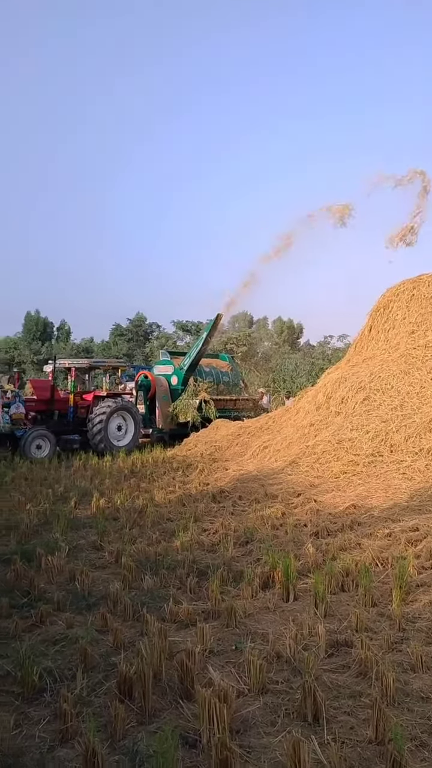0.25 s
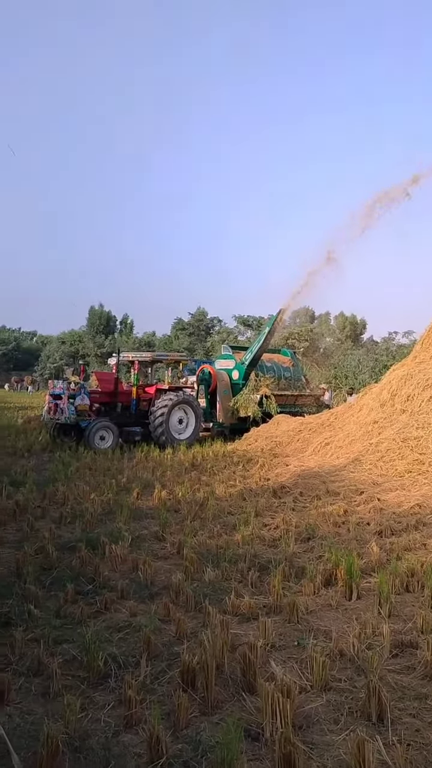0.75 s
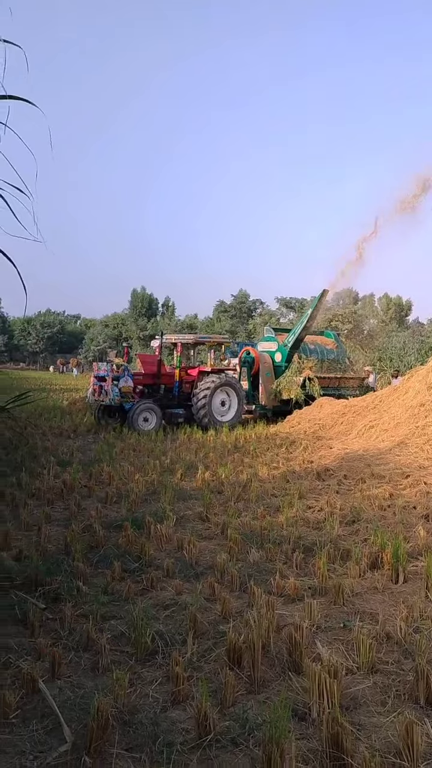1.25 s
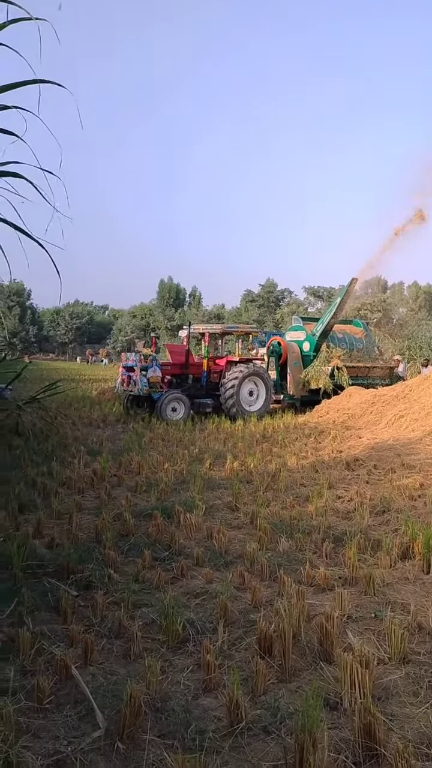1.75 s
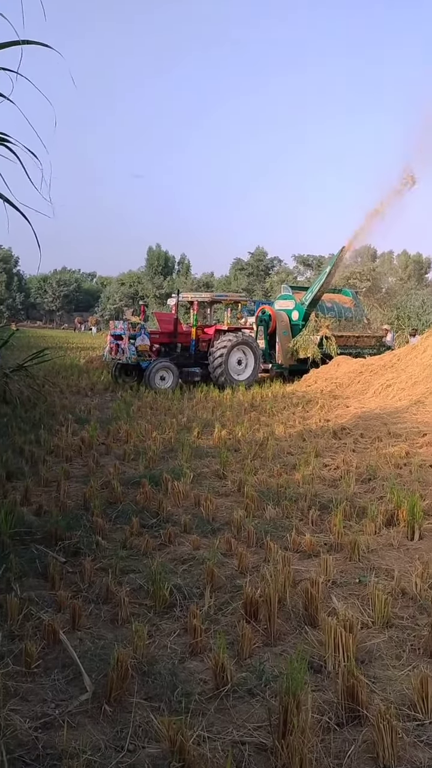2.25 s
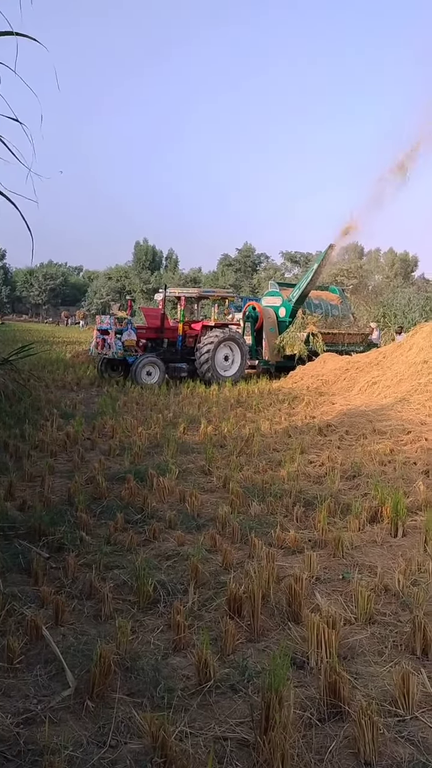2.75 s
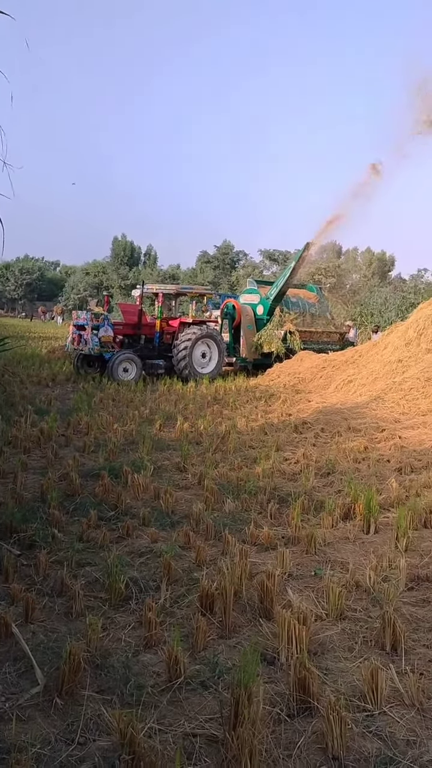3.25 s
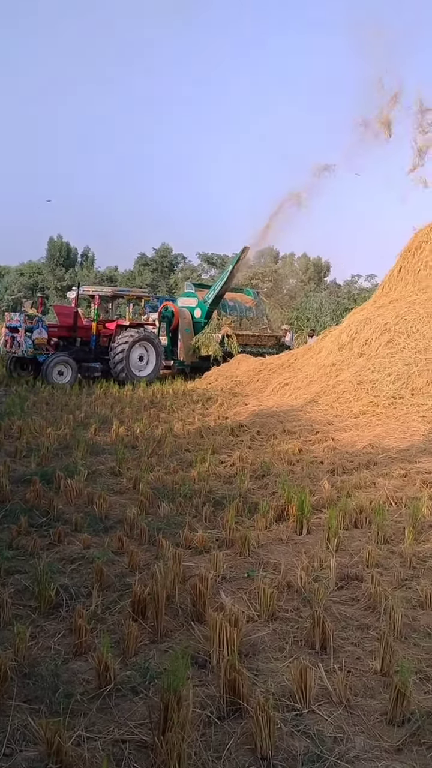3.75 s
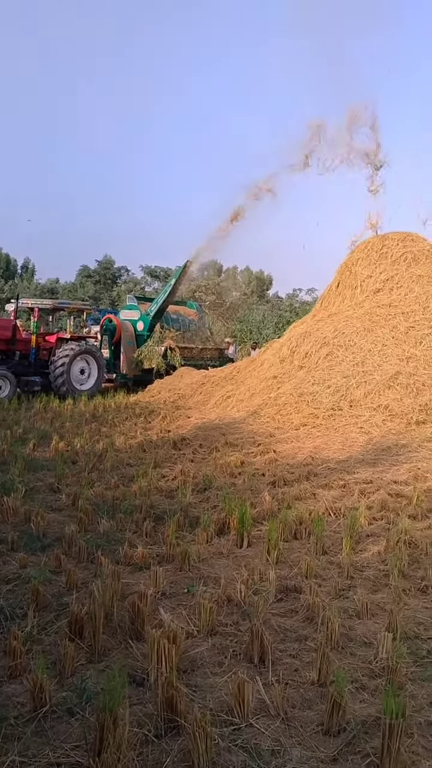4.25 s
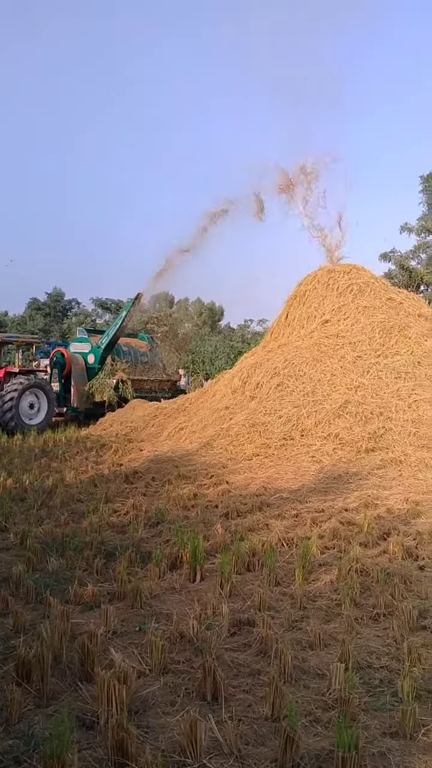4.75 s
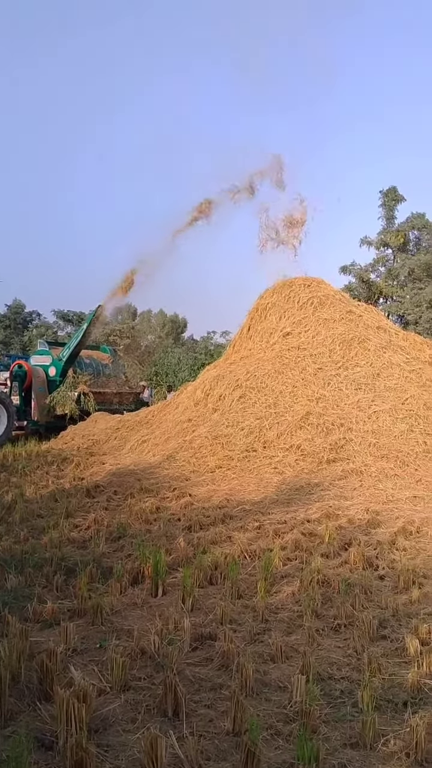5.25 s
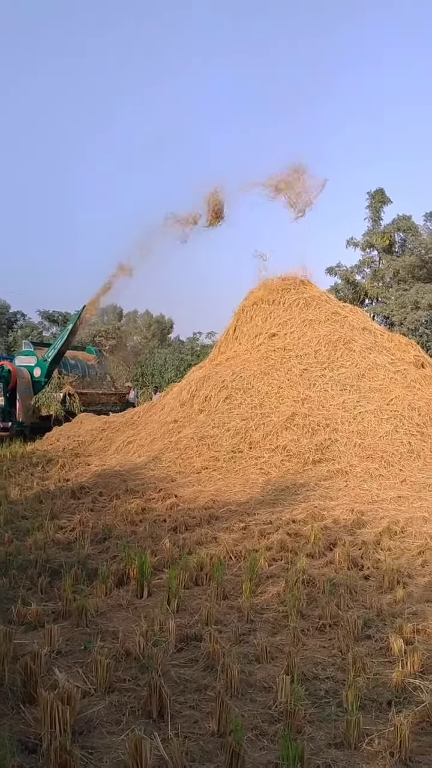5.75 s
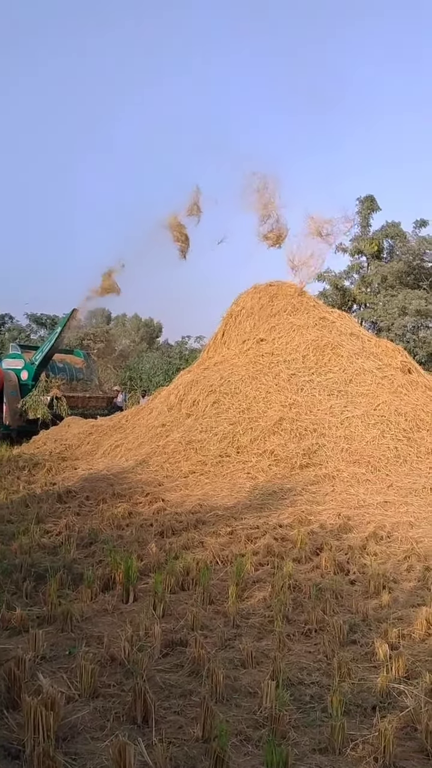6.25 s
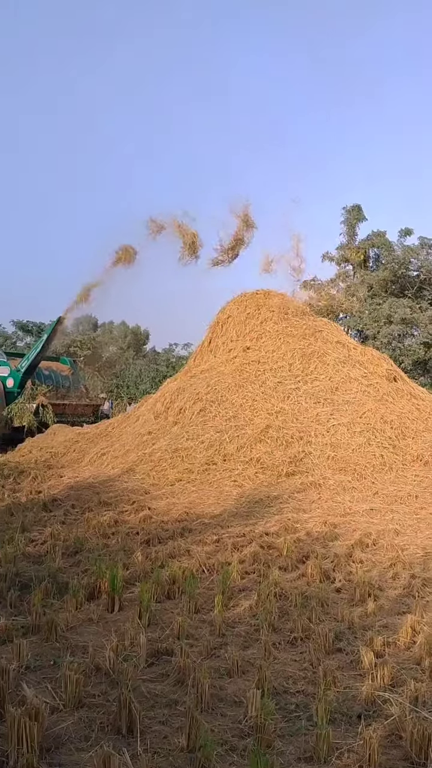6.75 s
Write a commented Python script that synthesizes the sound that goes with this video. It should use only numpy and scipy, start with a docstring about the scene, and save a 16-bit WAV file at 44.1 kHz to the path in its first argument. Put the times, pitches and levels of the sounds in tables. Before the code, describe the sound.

In an open stubble field, a tractor's diesel engine runs a thresher without pause. A low, steady blower hum sits inside a rough sheet-metal drum roar, with fast engine knocking and faint straw hiss on top. Around five seconds the machine sags slightly under load, the pitch dips and the firing throbs harder, then it recovers. Heard from some distance on a hand-held phone that turns, subtly shifting the tone.

```python
"""Tractor-driven rice thresher in a stubble field

A four-cylinder diesel (sines on its cycle, knock noise, struck block) drives the thresher by power shaft.
The geared straw blower is sines on its blade pass; drum roar is noise through sheet-metal resonances.
Straw hisses from the chute as treble noise and ticks on the stubble. A hand-held phone turns toward the
tractor and away; its right port hears the machine a little late and again off the holder's hand and body.
"""
import sys
import numpy as np
from scipy import signal
from scipy.fft import rfft, irfft, next_fast_len
from scipy.io import wavfile
from scipy.ndimage import uniform_filter1d, map_coordinates

SR = 44100
rng = np.random.default_rng(int(sys.argv[2]) if len(sys.argv) > 2 else 0)


def dump_mix(stems):
    """Bounce the given channels to the path in sys.argv[1] as a 16-bit WAV at rate SR."""
    frames = np.atleast_2d(stems).T  # one column per channel
    limited = np.clip(frames, -1, 1)  # hard clip at full scale
    pcm = np.round(limited * 32767).astype(np.int16)
    wavfile.write(sys.argv[1], SR, pcm)


N = 309582

BLADE_PASSES_PER_CYCLE = 10.556  # cycle = one full engine cycle, four firings
FREE_HZ = 140  # blade pass with a light feed; sag_hz counts down from it


def amp(db):
    """Decibels to amplitude."""
    return 10 ** (np.asarray(db) / 20)


def unit(x):
    """Scale to rms 1."""
    return x / np.sqrt(np.mean(x ** 2) + 1e-20)


def along(points, hz):
    """Interpolate (Hz, value) points on a log frequency axis."""
    f, v = np.transpose(points)
    return np.interp(np.log(hz + 1), np.log(f + 1), v)


def curves(rows):
    """One value per sample for each column after the time."""
    s, *cols = np.transpose(rows)
    return [np.interp(np.arange(N) / SR, s, c) for c in cols]


def wobble(knots_per_s):
    """Smooth random curve: a spline through normal random knots."""
    fine = np.arange(0, N / SR * knots_per_s + 1, 1 / 16)
    knots = rng.standard_normal(int(N * knots_per_s / SR) + 4)
    return np.interp(np.arange(N) * knots_per_s / SR, fine, map_coordinates(knots, [fine]))


def filtered(x, response):
    """Multiply the spectrum of x by a response of frequency."""
    m = next_fast_len(N + 8192)
    return irfft(rfft(x, m) * response(np.fft.rfftfreq(m, 1 / SR)), m)[..., :N]


def rush(gate, colour_db, patchy_db):
    """Two unrelated noises of one colour, rms 1, sharing a gate and patches of random gain."""
    z = signal.stft(gate * rng.standard_normal((2, N)), nperseg=512)[2]
    field = uniform_filter1d(rng.standard_normal(z.shape[1:]), size=8, axis=0)
    field = uniform_filter1d(field, size=12, axis=1)
    pair = signal.istft(z * amp(patchy_db * unit(field)), nperseg=512)[1][:, :N]
    return unit(filtered(pair, lambda hz: amp(colour_db(hz))))


def lines(turns, table, waver_db, drift_turns):
    """Sines on multiples of a turning shaft, each wavering in level and phase."""
    total = np.zeros(N)
    for multiple, db in table:
        level = np.sqrt(2) * amp(db + waver_db * wobble(9))
        phase_turns = multiple * turns + rng.random() + drift_turns * wobble(4.5)
        total += level * np.sin(2 * np.pi * phase_turns)
    return total


def blower(blades, sag_hz):
    """Blade-pass tone and multiples; it weakens as the speed sags."""
    # blower tone: blade_pass_multiple, relative_db
    blade_lines = [(1, 0), (2, -20), (3, -33), (4, -32), (5, -28)]
    free_db, db_per_hz = -26.5, -0.54
    return amp(free_db + db_per_hz * sag_hz) * lines(blades, blade_lines, waver_db=-0.36, drift_turns=0.0059)


def exhaust(cycles, sag_hz):
    """Exhaust pulses, four a cycle; unequal cylinders fill in between; most strengthen as the speed sags."""
    # exhaust tones: engine_cycle_multiple, relative_db
    exhaust_lines = [(4, 1), (8, 0), (10, -15), (11, -14), (12, -8), (13, -11), (14, -10), (15, -18),
                     (18, -15), (19, -13), (20, -16), (22, -10), (23, -15), (25, -21), (26, -24)]
    free_db, db_per_hz = -41.5, 0.5
    fourth_db, fourth_db_per_hz2 = -42.5, -1.38
    main = amp(free_db + db_per_hz * sag_hz) * lines(cycles, exhaust_lines, waver_db=0.6, drift_turns=0.012)
    # the firing tone's fourth multiple fades with the square of the sag
    fourth = lines(cycles, [(16, fourth_db)], waver_db=0.0, drift_turns=0.011)
    return main + amp(fourth_db_per_hz2 * sag_hz ** 2) * fourth


def gear_train(cycles):
    """Gear mesh whine and a shaft tone just above the second exhaust line, locked to the engine."""
    # gear mesh: engine_cycle_multiple, level_db (rms)
    mesh_lines = [(48, -56), (52, -56), (54, -57), (55, -56), (62, -61), (66, -57), (75, -63), (80, -60),
                  (87, -62), (104, -62), (112, -62)]
    # shaft tone: engine_cycle_multiple, level_db (rms)
    shaft_lines = [(8.44, -52)]
    total = lines(cycles, mesh_lines, waver_db=1.5, drift_turns=.03)
    for multiple, db in shaft_lines:
        phase = 2 * np.pi * (multiple * cycles + .04 * wobble(4))
        total += np.sqrt(2) * amp(db + wobble(6)) * np.sin(phase)
    return total


def beaters(cycles):
    """Tones on multiples of the drum's beater pass."""
    # beater tone: beater_pass_multiple, level_db (rms)
    beater_lines = [(2, -47.5), (4, -60.5)]
    passes_per_cycle = 8.61
    return lines(passes_per_cycle * cycles, beater_lines, waver_db=2.5, drift_turns=0.15)


def hum(blade_hz):
    """All shaft-locked tones; load shows as a sag in speed."""
    blades, sag_hz = np.cumsum(blade_hz) / SR, FREE_HZ - blade_hz
    cycles = blades / BLADE_PASSES_PER_CYCLE
    return blower(blades, sag_hz) + exhaust(cycles, sag_hz) + gear_train(cycles) + beaters(cycles)


def drum(level_db):
    """Beaten straw and air roar through the casing's resonances."""
    # roar spectrum: freq_hz, relative_density_db
    roar = [(20, -29.5), (35, -20.5), (45, -12.5), (70, -9), (90, -5.5), (128, -2), (170, -2.5),
            (200, -5.5), (260, -6), (400, -11.5), (700, -7.5), (1100, -10.5), (1500, -13), (1750, -23),
            (2600, -19), (5000, -35), (9000, -88)]
    # sheet-metal resonances: centre_hz, width_hz, boost_db
    panels = [(228.6, 24, 3.5), (300, 4.7, -0.5), (586, 9.9, -1), (594.3, 10, 7), (623, 54, 4),
              (703, 47, 4), (867, 20, 7), (994, 25, 4.5), (1040, 14, 4.5), (1075, 19, 2.5), (1145, 18, 4),
              (1300, 90, 4), (1340, 26, 1.5), (1488, 58, 6.5), (1640, 60, -0.5), (2100, 260, 9.5)]
    throb_db, throb_knots_per_s = .35, 60

    def casing_db(hz):
        return along(roar, hz) + sum(db / (1 + (2 * (hz - c) / w) ** 2) for c, w, db in panels)

    throb = amp(throb_db * wobble(throb_knots_per_s))  # clumps of straw meet the beaters
    return amp(level_db + 0.15 * wobble(7)) * rush(throb, casing_db, patchy_db=0.5)


def diesel_and_straw(cycles, pulse, knock_db, straw_db):
    """Combustion knock and straw hiss: noises swelling with each firing, every second one a little harder."""
    # knock spectrum: freq_hz, relative_density_db
    clatter = [(900, -33), (1800, -4.5), (2600, -1), (3300, -2), (3850, -4), (4300, -9), (5900, -14.5),
               (7000, -22.5), (8400, -41.5), (9500, -61)]
    # straw hiss spectrum: freq_hz, relative_density_db
    hiss = [(5000, -21.5), (7500, -12.5), (8500, -11.5), (10000, -5.5), (11000, -1.5), (13000, -1.5),
            (15000, -0.5), (16000, -5)]
    flutter_db, flutter_knots_per_s = .5, 45
    pair, firing, double = (np.cos(2 * np.pi * k * cycles) for k in (2, 4, 8))
    surge = amp(.4 * wobble(24))  # uneven swell shared by knock and straw hiss
    gate = surge * (1 + .03 * pair + pulse * firing + .03 * double)
    knock = rush(gate, lambda hz: along(clatter, hz), patchy_db=0.7)
    knock *= amp(knock_db + 0.17 * wobble(2.0))
    straw = rush(gate, lambda hz: along(hiss, hz), patchy_db=1.1)
    straw *= amp(straw_db + flutter_db * wobble(flutter_knots_per_s))
    return knock + straw


def valves(cycles, level_db, count=30):
    """Firings, valves and gears strike at the same crank angles every cycle and ring the block."""
    # firings and valve seats, third cylinder hardest: cycle_share, low_ring_db, high_ring_db
    strikes = [(.03, 3, 9), (.1, 10, 5), (.19, 8, 3), (.248, 7, 10), (.297, 10.5, 7), (.356, 7, 3),
               (.51, 14.5, 10), (.551, 10.5, 13.5), (.6, 2, 6), (.764, 11.5, 10), (.836, 11.5, 4),
               (.936, 4, 2)]
    # ring of the engine block: freq_hz, relative_density_db
    block = [(300, -40), (550, -6), (750, -7), (1000, -1), (1200, 1), (1480, 1.5), (1560, -8), (1800, -9),
             (2000, -6), (2150, -8), (2400, -3), (2650, -10), (3000, -18), (4500, -30), (7000, -60),
             (9000, -90)]
    split_hz = 1800  # between low and high ring
    loud_angle, *loud_db = np.transpose(strikes)
    angle = np.r_[loud_angle, rng.random(count)]  # plus count weaker strikes at random angles
    sizes = amp(np.c_[loud_db, rng.normal(-4.5, 3, (2, count))])
    sizes = sizes * rng.choice([-1, 1], len(angle))

    due = np.arange(int(cycles[-1]))[:, None] + angle
    at = np.interp(due, cycles, np.arange(N))
    at = at + 3 * rng.standard_normal(due.shape)  # slack in the train, samples
    spot = np.clip(at, 0, N - 1).astype(int).ravel()
    scatter = amp(rng.normal(0, 1.3, due.shape))
    blows = np.array([np.bincount(spot, (size * scatter).ravel(), N) for size in sizes])

    def ring(hz):
        high = 1 / (1 + (split_hz / (hz + 1)) ** 12)
        return amp(along(block, hz)) * [1 - high, high]

    return amp(level_db) * unit(filtered(blows, ring).sum(axis=0))


def ticks():
    """Stray straw ticks on the stubble nearby: short, thin bursts of noise."""
    # ticks: start_s, level_db (initial noise rms before the high-pass)
    tick_list = [(0.0468, -47.5), (0.6828, -45.5), (6.0701, -52)]
    t60_s, lowest_hz = .006, 9500
    out, t = np.zeros((2, N)), np.arange(SR // 50) / SR
    for start_s, db in tick_list:
        burst = amp(db - 60 * t / t60_s) * rng.standard_normal((2, len(t)))
        out[:, round(start_s * SR):][:, :len(t)] += burst
    return filtered(out, lambda hz: hz > lowest_hz)


def gripped(pair, turn):
    """Hand and phone body colour each port; the resonances cross-fade as the phone turns."""
    # grip resonances: centre_hz, width_hz, left_facing_db, left_turned_db, right_facing_db, right_turned_db
    grip = [(863, 85, -5.5, 0, 1, 3), (1050, 90, 1.5, 0.5, -1.5, -2), (1222, 270, -4.5, -3.5, 3, -1.5),
            (1600, 99, 0, 1.5, -2, 0.5), (2160, 76, -8, 4, -5, 0), (2254, 41, 3, 0, 3, 1.5),
            (2360, 110, 1, -8.5, -1, 1.5), (2470, 60, -2, -2.5, -2, 1.5), (2535, 60, 6.5, -3, 7, -0.5),
            (2615, 40, -3.5, -2, -3.5, -1), (4840, 200, 1.5, 1, 0.5, 2), (2770, 100, -6.5, 6.5, -3, 3),
            (2960, 246, -0.5, -8.5, 4.5, -5.5), (3300, 200, 2.5, 2, -3, 6), (3750, 110, 7, -1, 2, -3.5),
            (4020, 120, 0.5, 1, 1.5, -2), (4350, 230, 1, 1.5, 5, 1.5), (5150, 360, -6.5, -3, 2.5, 5),
            (5460, 180, 5, 1, 1.5, 4), (5900, 200, 0, 2.5, 1.5, -3)]
    hz0, width, *boosts = np.transpose(grip)

    def colour(hz):
        bells = 1 / (1 + (2 * (hz - hz0[:, None]) / width[:, None]) ** 2)
        return amp(np.array(boosts) @ bells)

    left_facing, left_turned, right_facing, right_turned = filtered(np.repeat(pair, 2, axis=0), colour)
    left = left_facing + turn * (left_turned - left_facing)
    right = right_facing + turn * (right_turned - right_facing)
    return left, right


def ports(tones, pair, turn):
    """The machine is long, so the ports share less treble; the right hears it by several moving paths."""
    # paths to the right port: facing_delay_ms, turned_delay_ms, gain
    paths = [(.072, .007, .8), (.393, .331, .44), (.549, .483, -.21), (1.876, 1.473, .09),
             (1.6, 1.524, .17), (1.737, 1.654, .34), (1.876, 1.706, -.46), (2.051, 1.909, -.31),
             (2.661, 2.27, .11)]
    # noise common to both ports: freq_hz, gain_db
    shared = [(100, 0.5), (1500, -2.5), (3000, -2), (4500, -5.5), (8000, -18.5), (15000, -9)]
    # noise that only the right port hears: freq_hz, gain_db
    spread = [(100, -18.5), (400, -6), (800, -21), (900, -4.5), (1050, -9), (1200, -4), (1450, -3.5),
              (1650, -0.5), (1800, -2), (2100, -5.5), (2500, -2.5), (4000, 2.5), (5000, -0.5), (8000, 0.5),
              (11000, 5), (15000, 4)]
    now = np.arange(N)
    left, own = gripped(pair, turn)
    common = tones + filtered(left, lambda hz: amp(along(shared, hz)))
    right = filtered(own, lambda hz: amp(along(spread, hz)))
    for facing_ms, turned_ms, gain in paths:
        delay_ms = facing_ms + (turned_ms - facing_ms) * turn
        right += gain * np.interp(now - delay_ms * SR / 1000, now, common)
    return np.array([left + tones, right])


def scene():
    """One speed curve drives the shaft-locked tones, knock, straw hiss and block strikes; drum roar ignores it."""
    # machine speed, slowing when a heavy sheaf is fed, then recovering: time_s, blade_pass_hz
    speed = [(0.0, 137.99), (0.5, 138.96), (0.9, 139.52), (1.3, 140.19), (1.7, 139.04), (2.1, 138.53),
             (2.5, 138.9), (2.9, 139.29), (3.4, 139.59), (3.8, 139.82), (4.2, 139.86), (4.7, 139.92),
             (5.05, 136.17), (5.4, 135.74), (5.8, 136.85), (6.2, 138.18), (6.6, 138.74), (7.02, 139.25)]
    # phone turned away from the tractor: time_s, turn_0_to_1
    turning = [(0.0, 0.72), (1.0, 0.25), (2.0, 0.27), (2.7, 0.08), (4.0, 0.16), (4.5, 0.42), (5.1, 0.8),
               (7.02, 0.95)]
    crank_lag_cycles = .065
    roar_db, knock_db, straw_db = -31.5, -44.5, -65.5  # before port colouring, phone facing the tractor
    knock_turn_db, straw_turn_db = 1.5, 2  # gain once turned toward the straw heap
    pulse_depth, pulse_per_hz = .09, .015  # firing swell, deeper as the speed sags

    blade_hz, turn = curves(speed)[0], curves(turning)[0]
    cycles = np.cumsum(blade_hz) / SR / BLADE_PASSES_PER_CYCLE - crank_lag_cycles
    pulse = pulse_depth + pulse_per_hz * (FREE_HZ - blade_hz)
    struck = valves(cycles, level_db=-38.8) * [[1], [.15]]  # small source: mostly common to both ports
    engine = diesel_and_straw(cycles, pulse, knock_db + knock_turn_db * turn, straw_db + straw_turn_db * turn)
    return ports(hum(blade_hz), drum(roar_db) + engine + struck, turn) + ticks()


def record(dry):
    """The phone's steep low-pass band limit; both ends fade over 3 ms."""
    top_hz = 15700
    low_pass = signal.ellip(12, .1, 50, top_hz, fs=SR, output="sos")
    edge = np.minimum(np.arange(N), np.arange(N)[::-1]) / (.003 * SR)
    return np.minimum(edge, 1) * signal.sosfiltfilt(low_pass, dry)


dry = scene()
out = record(dry)
dump_mix(out)
```